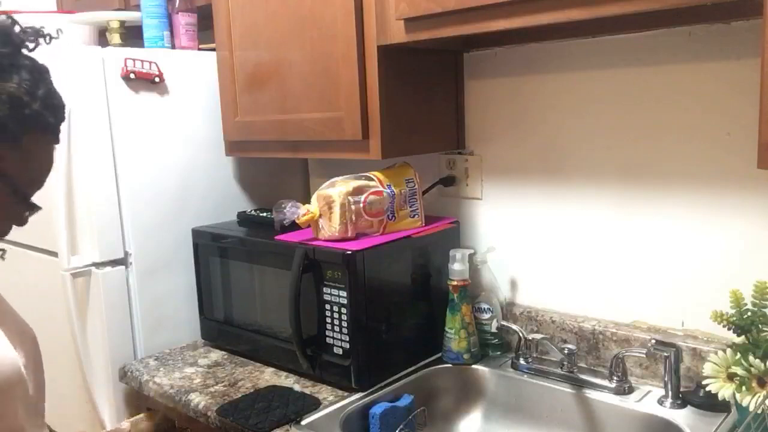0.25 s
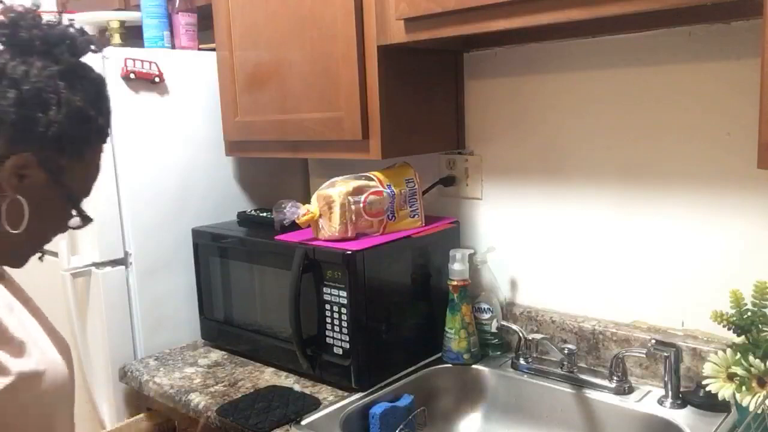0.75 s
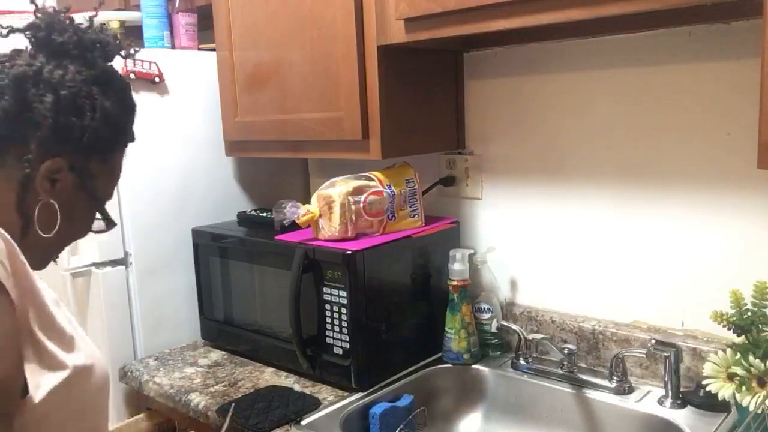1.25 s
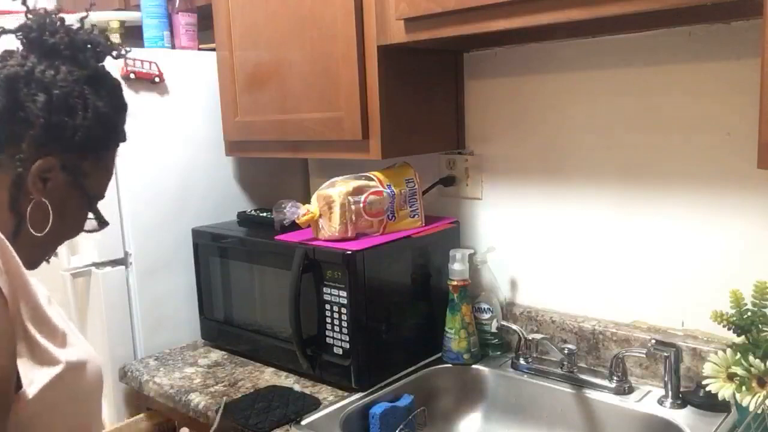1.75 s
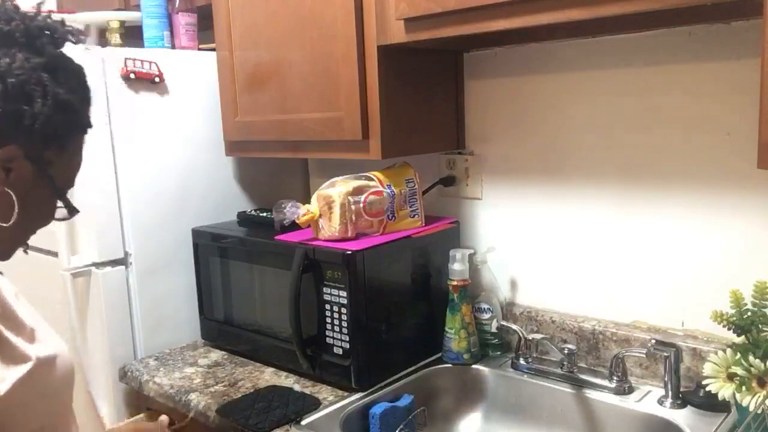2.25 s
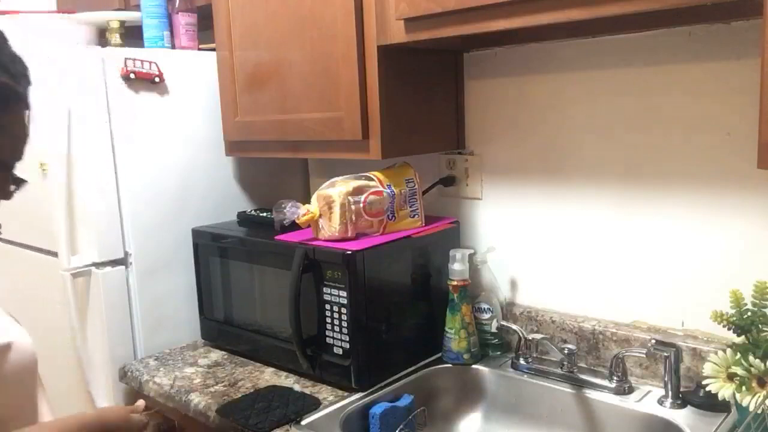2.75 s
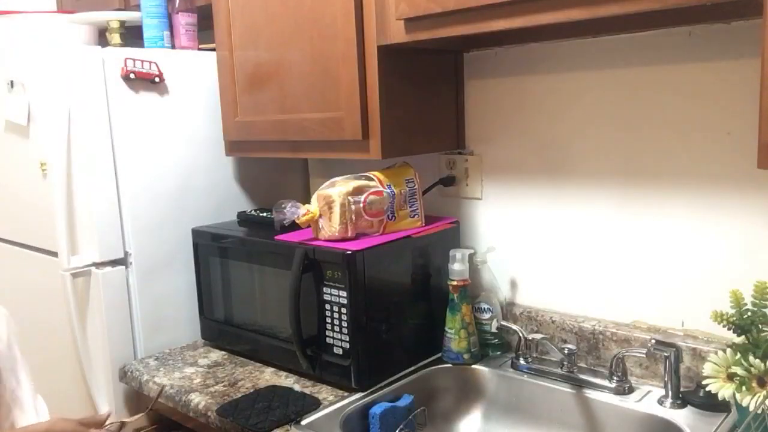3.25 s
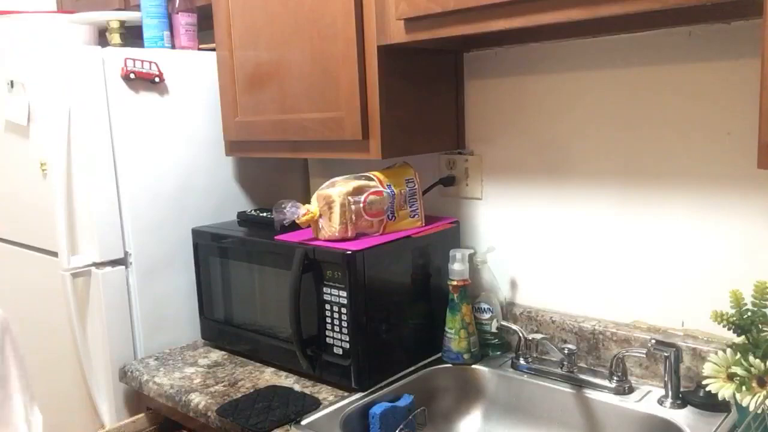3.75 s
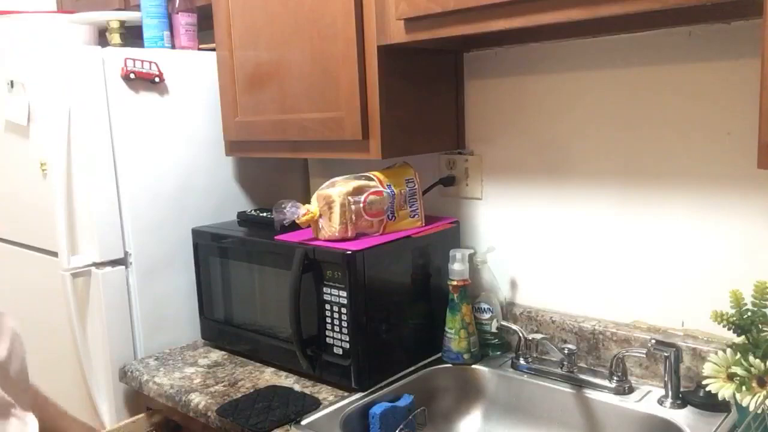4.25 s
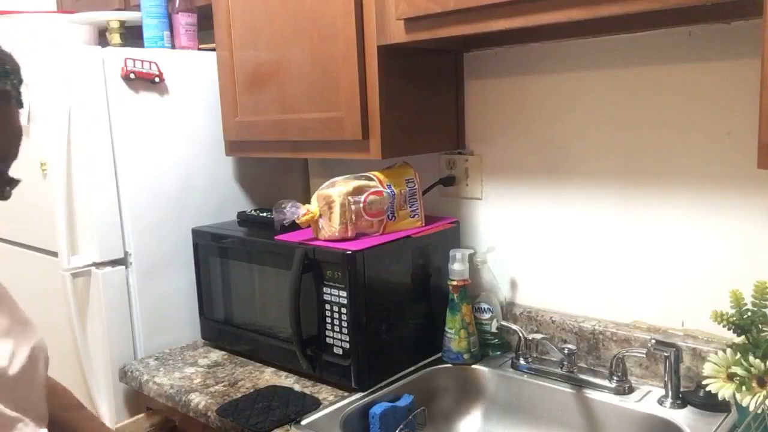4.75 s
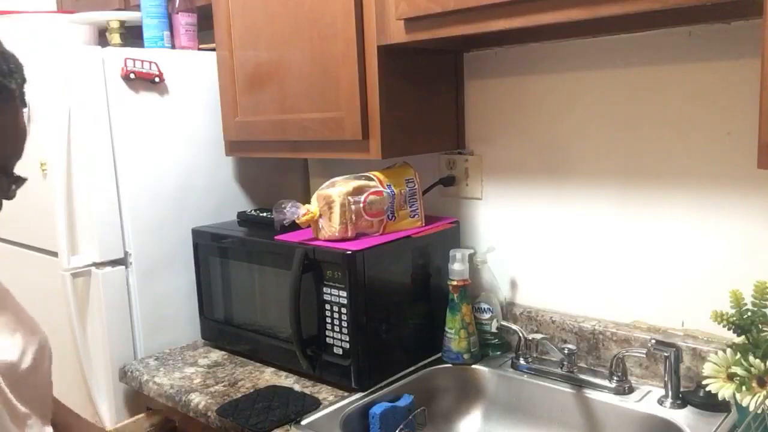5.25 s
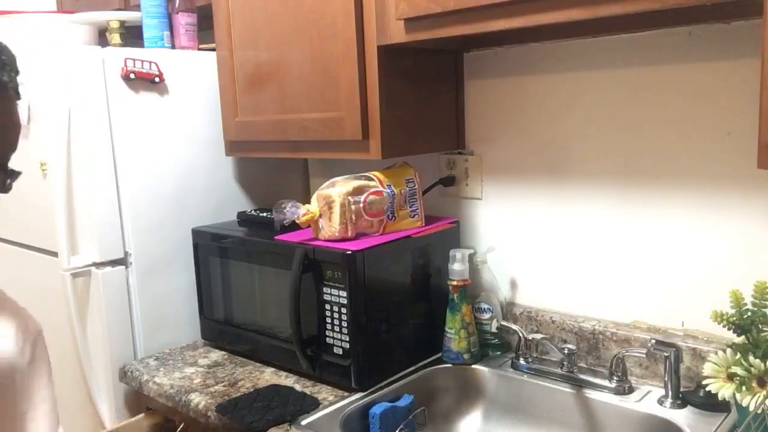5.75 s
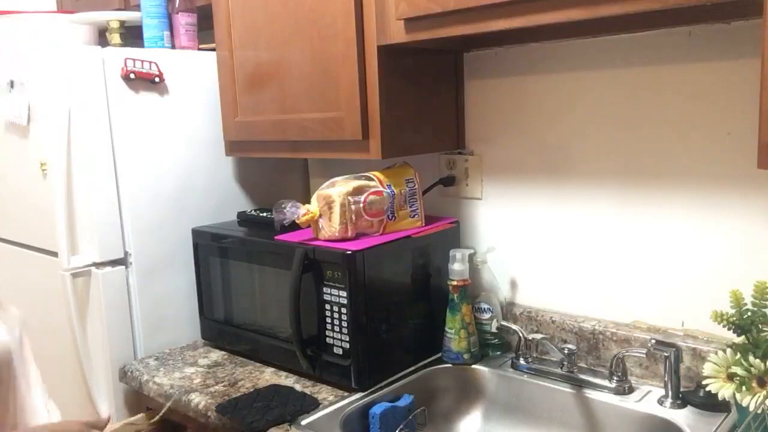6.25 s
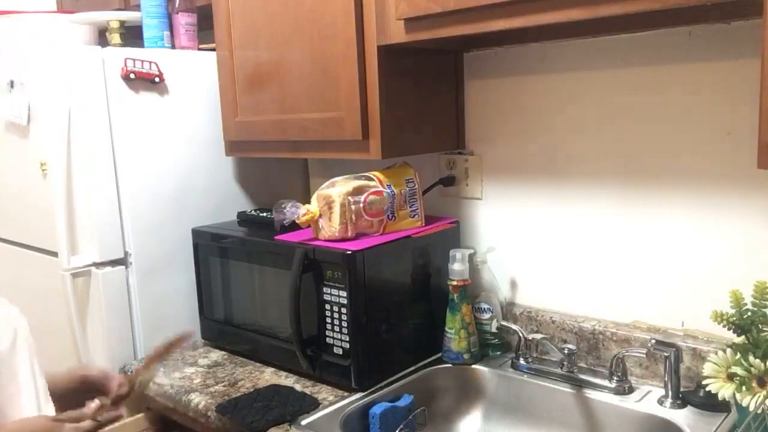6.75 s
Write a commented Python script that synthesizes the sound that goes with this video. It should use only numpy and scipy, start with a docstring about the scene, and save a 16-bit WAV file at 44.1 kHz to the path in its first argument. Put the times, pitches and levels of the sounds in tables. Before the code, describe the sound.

Close in a small, hard kitchen with faint steady hiss, a hand rummages in a utensil drawer. From 0 s there are light taps, with a sharper clattering knock near 0.3 and small metallic rattles around 0.6. After sparse ticks, a brighter burst of steel comes at 1.5, then high jingling and clear clinks from 1.7 to 2.3. It falls almost silent until 3.05. At 3.2 the drawer rumbles and a heavy wooden bang with hard clacks hits, followed by hollow knocks and some steel rattle to 3.75. After another lull, the loudest snapping thumps land at 4.5 and 4.65, with a short ladle-like ring at 4.75. Uneven knocks and clacks cluster around 5.4 and 5.7-5.9, with a ringing spoon. From 6.2 to 7 s the runners rumble low under smaller, duller taps. Short room reflections follow each blow.

```python
"""A small hard-walled kitchen, with a hand rummaging in a drawer just out of sight of the microphone.
Over a steady hiss the drawer rumbles on its runners: filtered noise, jumping up at each blow and dying away.
Bursts of filtered clicks make utensils knock on the wooden box, clack together and jingle the steel.
Damped sines add hard snaps and clear ringing strikes; decaying noise bands answer as the room."""
import sys
import numpy as np
from scipy import signal
from scipy.fft import rfft, irfft
from scipy.io import wavfile

SR = 44100
rng = np.random.default_rng(int(sys.argv[2]) if len(sys.argv) > 2 else 0)


def inscribe(sig):
    """Save sig as 16-bit PCM at rate SR to the path in sys.argv[1].

    A 1-D sig is mono; a 2-D sig holds one channel per row.
    Samples are clipped to [-1, 1] before scaling.
    """
    pcm = np.round(np.clip(np.atleast_2d(sig).T, -1, 1) * 32767)
    wavfile.write(sys.argv[1], SR, pcm.astype(np.int16))


N = 309131


def from_db(db):
    """Amplitude gain of a level in dB."""
    return 10 ** (np.asarray(db) / 20)


def rms_one(x):
    """Scale a signal to rms 1."""
    return x / np.sqrt(np.mean(x ** 2) + 1e-20)


def in_time(rows):
    """Interpolate each column of a time table at every sample."""
    times, *columns = np.transpose(rows)
    return [np.interp(np.arange(N) / SR, times, column) for column in columns]


def at_hz(points, hz):
    """Read a curve over frequency on a log axis."""
    point_hz, values = np.array(points).T
    return np.interp(np.log(hz + 1), np.log(point_hz), values)


def colour(x, spectrum, size=8192):
    """Causal (minimum phase) filter of the given spectrum; white noise keeps its rms."""
    level_db = at_hz(spectrum, np.fft.rfftfreq(size, 1 / SR))
    cepstrum = irfft(np.log(from_db(level_db)))
    # folding the cepstrum forward in time gives minimum phase
    cepstrum[1:size // 2] *= 2
    cepstrum[size // 2 + 1:] = 0
    pulse = irfft(np.exp(rfft(cepstrum)))[:size // 2]
    return signal.fftconvolve(x, pulse / np.sqrt(np.sum(pulse ** 2)))[:N]


def ring(x, hz, t60):
    """Two-pole resonator: a unit click sets a sine of about height 1 ringing, 60 dB down after t60 s."""
    r = from_db(-60 / (t60 * SR))
    w = 2 * np.pi * hz / SR
    return signal.lfilter([0, np.sin(w)], [1, -2 * r * np.cos(w), r * r], x + 1e-18)


# steady background hiss: (frequency [Hz], relative level [dB per Hz])
HISS_SPECTRUM = [(18, -54), (30, -21.5), (98, 0), (170, -15), (721, -18.5), (1040, -26), (1250, -23),
                 (1390, -22), (7870, -33.5), (12000, -39), (16000, -40)]
HISS_DB = -65


def hiss():
    """Steady noise, strongest in the bass and falling towards the treble."""
    return from_db(HISS_DB) * colour(rng.standard_normal(N), HISS_SPECTRUM)


# decay of the small kitchen: (frequency [Hz], t60 [s])
KITCHEN_DECAY = [(200, 0.39), (700, 0.48), (2000, 0.31), (6000, 0.37), (15000, 0.25)]
KITCHEN_DB = -7


def kitchen(x):
    """Dense reflections that build up in a few milliseconds and die band by band."""
    t = np.arange(SR) / SR
    tail = np.zeros(SR)
    edges_hz = 60 * 2 ** np.arange(0, 8.6, .5)   # half-octave bands
    for low, high in zip(edges_hz, np.minimum(edges_hz[1:], .45 * SR)):
        band_filter = signal.butter(2, [low, high], "band", fs=SR, output="sos")
        band = signal.sosfilt(band_filter, rng.standard_normal(SR))
        tail += band * from_db(-60 * t / at_hz(KITCHEN_DECAY, np.sqrt(low * high)))
    tail *= 1 - np.exp(-t / 0.0013)
    return signal.fftconvolve(x, tail / np.sqrt(np.sum(tail ** 2)))[:N]


# blows in the drawer: (time [s], force on the box [dB], force between handles [dB],
# force on the steel [dB], length of the bouncing [s])
BLOWS = np.array([(.014, -54, -51, -64.5, 0.02), (0.135, -48, -59, -52.5, 0.0099),
                  (0.253, -68, -46.5, -57, 0.013), (0.275, -29.5, -36.5, -30, 0.024),
                  (0.291, -48, -39, -34.5, 0.027), (.359, -51.5, -55, -49, 0.048),
                  (0.48, -45.5, -48, -53, 0.018), (0.568, -43, -52.5, -39.5, 0.11),
                  (.609, -36, -44.5, -37, 0.021), (.66, -49.5, -37.5, -62, 0.011),
                  (0.774, -75, -53.5, -83, 0.016), (0.854, -40.5, -50.5, -55.5, 0.023),
                  (1.002, -60.5, -52.5, -66.5, 0.017), (1.149, -44.5, -52, -49, 0.026),
                  (1.246, -69, -61, -66, 0.023), (1.32, -74, -72, -66, 0.0073),
                  (1.367, -63, -52, -52, 0.015), (1.394, -49, -50.5, -58.5, 0.025),
                  (1.437, -49, -58, -58, .047), (1.472, -42, -36.5, -29.5, 0.022),
                  (1.487, -26.5, -40.5, -27, 0.036), (1.531, -37.5, -34.5, -20.5, 0.039),
                  (1.581, -40, -48, -42, 0.017), (1.716, -42, -50, -41, 0.044),
                  (1.837, -84, -53, -38.5, 0.026), (1.853, -35.5, -43.5, -33, 0.017),
                  (1.904, -49, -48.5, -34.5, 0.059), (2.027, -74, -41, -31, 0.051),
                  (2.142, -53, -52, -32.5, 0.048), (2.171, -42.5, -37.5, -44, 0.029),
                  (2.212, -33.5, -29.5, -42, 0.013), (2.275, -53.5, -36.5, -38, 0.031),
                  (3.064, -48, -65, -50.5, 0.031), (3.195, -26.5, -33, -50.5, 0.037),
                  (3.24, -19.5, -16, -34, 0.031), (3.26, -21, -38, -53, 0.1), (3.284, -36, -54, -65, 0.012),
                  (3.41, -70, -69, -44.5, 0.06), (3.452, -42, -53, -57, 0.066),
                  (3.554, -90, -107, -36, 0.023), (3.63, -46, -45, -33.5, 0.045),
                  (3.67, -23, -36, -52, 0.021), (3.719, -21, -29.5, -39.5, 0.027),
                  (3.96, -45.5, -75, -97, 0.019), (4.371, -42.5, -54, -58, 0.027),
                  (4.386, -44, -50, -70, 0.034), (4.501, -17, -26, -43, 0.028),
                  (4.649, -14, -28, -47.5, 0.021), (4.731, -25.5, -35.5, -53, 0.016),
                  (4.751, -26, -54, -70, 0.034), (4.97, -30, -58.5, -72, 0.012),
                  (5.128, -38.5, -51.5, -66, 0.045), (5.148, -43, -60, -46.5, 0.006),
                  (5.241, -75, -51, -51, 0.012), (5.323, -46, -57, -73, 0.032),
                  (5.387, -29.5, -42.5, -52, 0.058), (5.41, -23.5, -33, -63, 0.02),
                  (5.433, -29, -34.5, -67, 0.046), (5.609, -33, -46, -58, 0.015),
                  (5.715, -28, -75, -74, 0.016), (5.749, -43, -73, -60, 0.0082),
                  (5.813, -21.5, -40, -50.5, 0.017), (5.864, -27.5, -42, -74, 0.019),
                  (5.897, -23, -36, -67, 0.017), (6.214, -53.5, -62.5, -77, 0.055),
                  (6.41, -46, -52.5, -85, 0.026), (6.437, -49, -71, -79, 0.075),
                  (6.555, -34, -59.5, -81, 0.0064), (6.661, -67, -78, -80, 0.034),
                  (6.694, -52, -45, -82, 0.014), (6.73, -42, -45, -94, 0.019),
                  (6.875, -52.5, -56, -70, 0.0088)])
BLOW_SAMPLES = np.round(BLOWS[:, 0] * SR).astype(int)

# the drawer rolling on its runners: (time [s], level [dB])
ROLLING = [(0, -64), (1.4, -68), (2.8, -81.5), (3.15, -44.5), (3.8, -50.5), (4, -58), (6.08, -68),
           (6.24, -45.5), (6.75, -44), (7.01, -47.5)]
# rumble of the runners: (frequency [Hz], relative level [dB per Hz])
RUMBLE_SPECTRUM = [(15, -60), (25, -32), (79, -1.5), (135, -1), (190, -7.5), (211, -10), (257, -10.5),
                   (300, -14.5), (390, -14.5), (660, -120)]
# jolt level = JOLT_DB + JOLT_FOLLOWS * force on the box in dB
JOLT_DB, JOLT_FOLLOWS, JOLT_T60_S = -37, 0.66, 1.1


def runners():
    """Low noise rumble while the drawer rolls; every blow on the box also shakes the runners."""
    jolts = np.zeros(N)
    jolts[BLOW_SAMPLES] = from_db(JOLT_DB + JOLT_FOLLOWS * BLOWS[:, 1]) ** 2
    power_decay = from_db(-120 / (JOLT_T60_S * SR))   # power falls by the square of amplitude
    rolling_power = from_db(in_time(ROLLING)[0]) ** 2
    power = rolling_power + signal.lfilter([1], [1, -power_decay], jolts)
    return np.sqrt(power) * colour(rng.standard_normal(N), RUMBLE_SPECTRUM)


STIR_FITS_DB, STIR_FITS_PER_S = 2.5, 25   # rms swing, corner frequency [Hz]


def fits():
    """Small fits and starts of the stirring in dB: noise twice through a one-pole low-pass."""
    r = np.exp(-2 * np.pi * STIR_FITS_PER_S / SR)
    slow = signal.lfilter([1], [1, -2 * r, r * r], rng.standard_normal(N))
    return STIR_FITS_DB * rms_one(slow)


# the hand shoving things about:
# (time [s], stirring of handles on wood [dB], jingling of steel [dB])
STIRRING = [(0, -63, -59.5), (.26, -69.5, -76), (.51, -57.5, -70), (1, -74, -85), (1.44, -76.5, -74),
            (1.63, -57, -53), (2.16, -63, -79), (2.25, -47.5, -40.5), (2.44, -93.5, -100),
            (2.96, -93, -104), (3.05, -58.5, -90), (3.35, -69, -75), (3.62, -56.5, -61), (3.87, -61, -89.5),
            (4.15, -79, -99), (4.43, -75, -83), (4.62, -58, -75), (4.85, -62.5, -82), (5.12, -59, -81),
            (5.42, -69.5, -85), (5.6, -50, -65.5), (6.02, -67.5, -90), (6.56, -60, -103), (7.01, -63, -84)]


def stirring():
    """Stirring and jingling levels in dB, both swayed by the same fits and starts."""
    return in_time(STIRRING) + fits()


CONTACTS_PER_S = 3500


def contacts(spread_db):
    """Dense uneven clicks of random sign, rms 1."""
    sizes = from_db(spread_db * np.minimum(rng.exponential(1, N), 3))
    signs = rng.choice([-1, 1], N)
    struck = rng.random(N) < CONTACTS_PER_S / SR
    return rms_one(sizes * signs * struck)


def bouncing(levels_db, first_db, swell_s):
    """Force of the blows: a first hit, then contacts that swell, go on for a moment and stop."""
    chatter, hits = np.zeros(N + SR), np.zeros(N)
    t = np.arange(SR // 4) / SR
    lengths_s = np.clip(BLOWS[:, 4], .003, .1)
    for at, length_s, db in zip(BLOW_SAMPLES, lengths_s, levels_db):
        swell = 1 - np.exp(-t / swell_s)
        stop = np.exp(-(t / length_s) ** 1.48)
        chatter[at:at + len(t)] += from_db(db) * swell * stop
        hits[at] = from_db(db + first_db)
    return chatter[:N], hits


def blow_force(levels_db, stir_db, first_db, swell_s, spread_db):
    """Uneven contacts driven by the bouncing and the stirring, plus the first hits."""
    chatter, hits = bouncing(levels_db, first_db, swell_s)
    return (chatter + from_db(stir_db)) * contacts(spread_db) + hits


def shaken(force, modes, level_db, luck_db):
    """Every blow shakes other pieces, so each mode gets a new strength each time."""
    luck = luck_db * rng.standard_normal((len(BLOWS), len(modes)))
    last_blow = np.searchsorted(BLOW_SAMPLES, np.arange(N), "right") - 1
    out = np.zeros(N)
    for k, (hz, db, t60) in enumerate(modes):
        strength = from_db(db + level_db + luck[:, k])[last_blow]
        out += ring(strength * force, hz, t60)
    return out


# hard dry snaps: (time [s], starting level [dB], frequency [Hz])
SNAPS = [(0.2758, -29, 3030), (3.243, -22, 1970), (3.2654, -5, 1150), (4.5026, -4, 2490),
         (4.6469, -10, 2630), (5.4127, -6.5, 2360), (5.817, -12, 1240), (5.8666, -23.5, 3530),
         (5.8958, -20.5, 1960), (6.4098, -43, 2060), (6.4348, -40, 2150), (6.559, -32, 3000),
         (6.7297, -22, 1440)]
SNAP_T60_S = .0074


def cracks():
    """Hard dry snaps: a few cycles of a heavily damped sine."""
    out, t = np.zeros(N), np.arange(SR // 50) / SR
    for s, db, hz in SNAPS:
        at = round(s * SR)
        out[at:at + len(t)] += from_db(db - 60 * t / SNAP_T60_S) * np.sin(2 * np.pi * hz * t)
    return out


# broad thud of the wood: (frequency [Hz], relative level [dB per Hz])
BOX_THUD = [(71, -26), (120, -38), (167, -25), (205, -37.5), (358, 1), (558, -10), (720, -5.5), (2500, -9),
            (3250, -22), (5500, -120)]
# hollow modes of the box: (frequency [Hz], width [Hz], level [dB])
HOLLOW_MODES = [(361, 40, -4), (727, 56, -7), (1100, 80, -10)]
SLIDE_DB = 6.5   # the box hears the stirring this much above the handles


def box(stir_db):
    """The wooden box: a broad thud with a few hollow modes, the wider the shorter."""
    force = blow_force(BLOWS[:, 1], stir_db, first_db=15, swell_s=0.011, spread_db=3.5)
    thud = colour(force, BOX_THUD)
    out = thud.copy()
    for hz, width_hz, db in HOLLOW_MODES:
        t60 = np.log(1000) / (np.pi * width_hz)
        gain = from_db(db) * 4 * np.pi * width_hz / SR   # offsets the build-up in a narrow mode
        out += gain * ring(thud, hz, t60)
    return out


PIECE_HZ, PIECE_DB_PER_OCTAVE = 3040, 19.5   # pitch at equal forces, force ratio for an octave


def piece_hz():
    """Pitch of the piece in each blow: more steel against box means smaller and higher."""
    octaves = (BLOWS[:, 3] - BLOWS[:, 1]) / PIECE_DB_PER_OCTAVE
    return np.clip(PIECE_HZ * 2 ** octaves, 950, 3100)


# dry contact of handles and tray: (frequency [Hz], relative level [dB per Hz])
CLACK_SPECTRUM = [(590, -15.5), (1000, -21), (1240, -3.5), (1350, -9), (3210, -6.5), (3620, -9),
                  (4560, -11), (5090, -16), (9000, -31.5), (11700, -35), (19800, -120)]
# ringing utensil bodies: (frequency [Hz], relative level [dB], t60 [s])
HANDLE_MODES = [(1280, 0, .04), (1510, 0, .04), (1900, 0, .04), (2150, 0, .04), (2500, -2, .04),
                (2980, 0, .04), (3300, -3, .04), (3600, -6, .03), (4100, -8, .03), (4600, -6, .03)]


def clack(stir_db):
    """Handles and tray: short dry contacts with brief rings; the piece struck colours each blow."""
    force = blow_force(BLOWS[:, 2], stir_db, first_db=3.5, swell_s=0.0031, spread_db=2.5)
    out = colour(force, CLACK_SPECTRUM)
    out += shaken(force, HANDLE_MODES, level_db=-37, luck_db=5.0)
    ends = [*BLOW_SAMPLES[1:], N]
    for hz, at, end in zip(piece_hz(), BLOW_SAMPLES, ends):
        push = np.r_[force[at:end], np.zeros(SR // 10)][:N - at]   # leaves room to ring out
        out[at:at + len(push)] += from_db(-10) * ring(push, hz, .0055)
    return out


# countless weak steel modes: (frequency [Hz], relative level [dB per Hz])
STEEL_WASH = [(2350, -14), (4000, -9), (4520, -4), (4900, -6), (6290, -5.5), (6820, -4), (7660, -11.5),
              (9010, -2.5), (10300, -11.5), (11200, -5), (12500, -4), (13600, -9), (16000, -9.5)]
# clear modes of the cutlery: (frequency [Hz], relative level [dB], t60 [s])
STEEL_MODES = [(4450, -8, .06), (5200, -17, .05), (6210, -12, .06), (6900, -8, .06), (8750, -8, .07),
               (9020, -4, .06), (9430, -8, .06), (10980, -7, .08), (11420, -3, .06), (12980, -4, .06),
               (13430, -3, .06), (13630, -3, .07), (14110, -3, .08), (14510, -5, .07), (14860, -6, .08),
               (15250, -7, .06)]


def steel(jingle_db):
    """Knives, forks and spoons jingle in clear modes over a bright wash."""
    force = blow_force(BLOWS[:, 3], jingle_db, first_db=7.5, swell_s=0.0023, spread_db=2.0)
    return colour(force, STEEL_WASH) + shaken(force, STEEL_MODES, level_db=-40, luck_db=5.0)


# clear strikes: (time [s], piece, level [dB])
STRIKES = [(.378, "teaspoons", -58), (.481, "fork", -40.5), (1.727, "box", -37), (1.915, "teaspoons", -37),
           (1.907, "tablespoons", -38), (1.921, "box", -33), (2.033, "tablespoons", -33),
           (2.278, "tablespoons", -42.5), (2.034, "teaspoons", -30), (2.09, "knives", -57),
           (2.15, "knives", -34), (2.195, "teaspoons", -31), (2.28, "jar", -59), (2.29, "knives", -60),
           (3.211, "box", -17.5), (3.284, "tray", -9.5), (3.288, "drawer floor", -16.5),
           (3.454, "box", -23), (3.463, "teaspoons", -48), (3.557, "tongs", -45), (3.63, "fork", -31),
           (3.651, "tongs", -40), (3.736, "box", -23.5), (4.758, "ladle", -23), (4.914, "ladle", -34.5),
           (5.127, "box", -32), (5.239, "spoon", -64), (5.411, "tongs", -41.5), (5.431, "spoon", -28),
           (5.57, "spoon", -50), (5.716, "scoop", -34), (5.825, "box", -29.5), (6.089, "skewer", -57.5),
           (6.66, "spoon", -55)]
# modes of each piece that rings out: (frequency [Hz], relative level [dB], t60 [s])
PIECE_MODES = {"box": [(362, 0, .1)], "drawer floor": [(160, 0, .12)], "teaspoons": [(10981, -6, .14),
               (14082, -3, .15), (14860, 0, .17), (15245, -8, .13)], "knives": [(7100, 0, .15),
               (8750, -4, .15), (11700, -14, .29), (14660, -12, .25)], "fork": [(4030, 0, .16),
               (4150, -4, .1)], "ladle": [(947, 0, .2), (4478, -27, .13)], "tongs": [(9150, 0, .15),
               (12230, -5, .2), (13307, -6, .25), (13738, -4, .1)], "spoon": [(3316, 0, .45),
               (2497, -9, .12), (5936, -14, .2)], "scoop": [(1510, 0, .2), (2153, 1, .18)],
               "skewer": [(2620, 0, .6), (4400, -9, .6), (1420, -2, .6)], "jar": [(1265, 0, 1.6)],
               "tray": [(745, 0, .12), (1200, -4, .09)], "tablespoons": [(3050, 0, .12), (4600, -3, .16),
               (6650, -5, .12), (8300, -6, .14)]}


def clinks():
    """Single pieces struck clear: decaying sines whose loudness wavers at a random rate."""
    out, t = np.zeros(N + SR), np.arange(SR) / SR
    # waver rate [Hz] and phase [rad] for up to four modes a strike
    wavers = rng.uniform([15, 0], [45, 2 * np.pi], (len(STRIKES), 4, 2))
    onset = 1 - np.exp(-t / 0.0005)
    for (s, piece, strike_db), strike_wavers in zip(STRIKES, wavers):
        at = round(s * SR)
        for (hz, db, t60), (waver_hz, phase) in zip(PIECE_MODES[piece], strike_wavers):
            fade = from_db(strike_db + db - 60 * (t / t60) ** 1.04)
            waver = 1 + .45 * np.sin(2 * np.pi * waver_hz * t + phase)
            out[at:at + len(t)] += onset * fade * waver * np.sin(2 * np.pi * hz * t)
    return out[:N]


def scene():
    """Hiss, rumble and the kitchen's answer behind the rummaged drawer."""
    stir_db, jingle_db = stirring()
    drawer = cracks() + box(stir_db + SLIDE_DB) + clack(stir_db) + steel(jingle_db)
    # the knocks, clacks and jingles keep out of the deep bass
    drawer = signal.sosfilt(signal.butter(2, 170, "high", fs=SR, output="sos"), drawer)
    tones = clinks()
    room = from_db(KITCHEN_DB) * kitchen(drawer + .5 * tones)
    return (hiss() + runners() + room + 1.012 * drawer + tones)[None]


CUTOFF_HZ = 15850


def record(dry):
    """At the microphone deep bass is lost, peaks are rounded and the top is cut."""
    dry = signal.sosfilt(signal.butter(4, 45, "high", fs=SR, output="sos"), dry)
    rounded = .8 * np.tanh(dry / .8)
    return signal.sosfilt(signal.ellip(12, .5, 80, CUTOFF_HZ, fs=SR, output="sos"), rounded)


dry = scene()
out = record(dry)
inscribe(out)
```